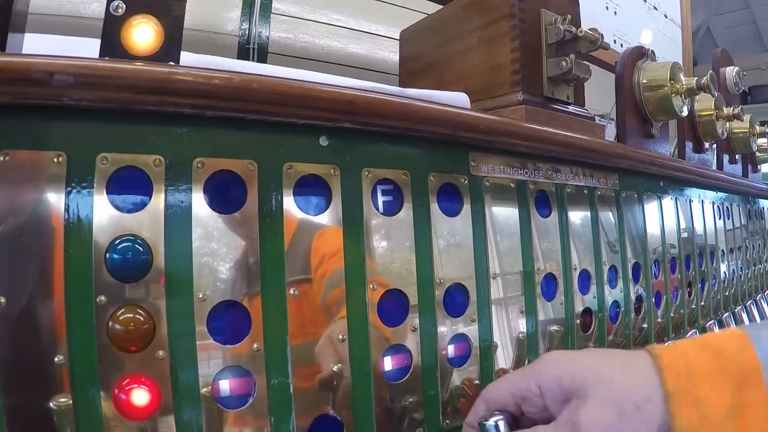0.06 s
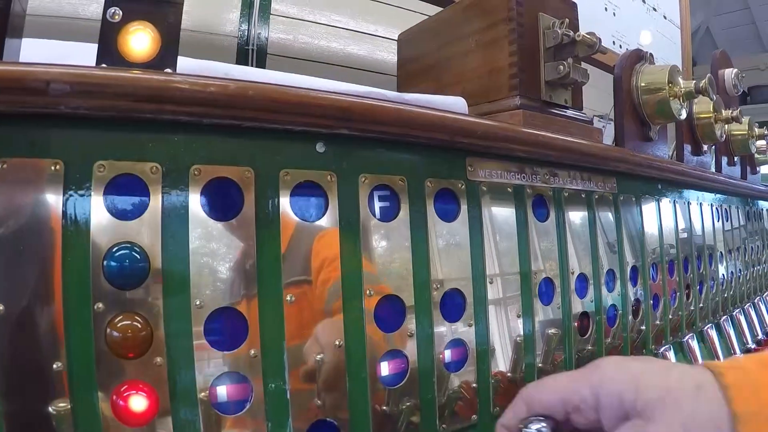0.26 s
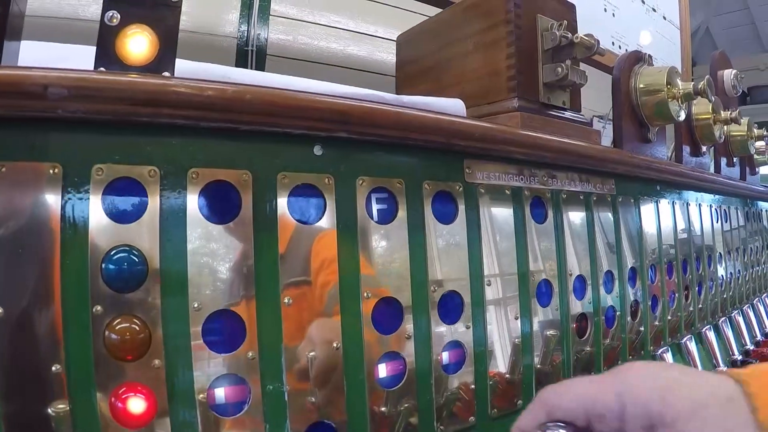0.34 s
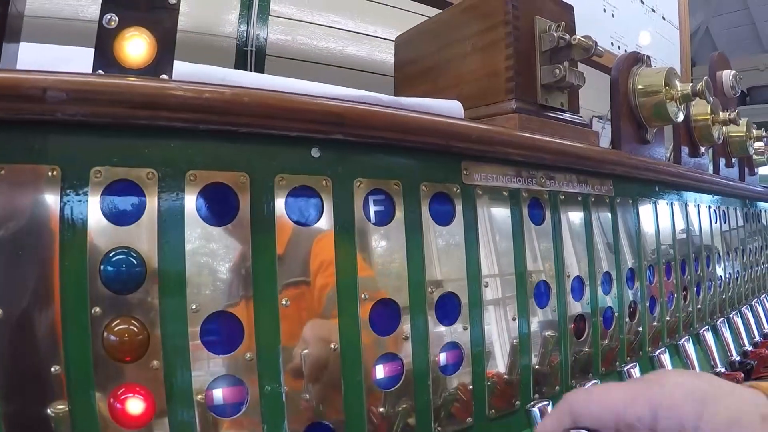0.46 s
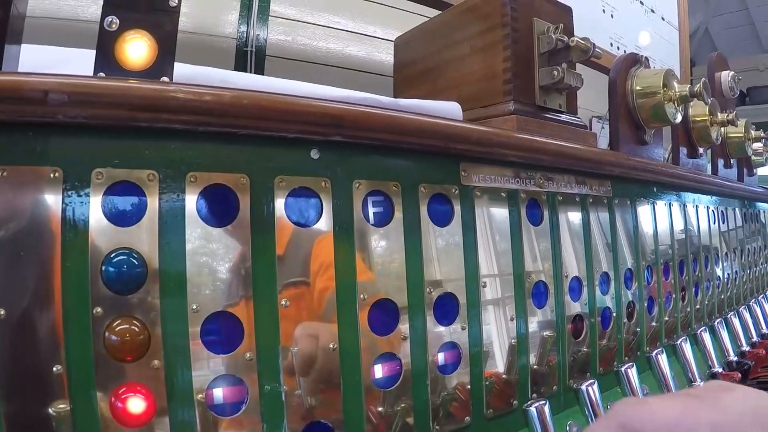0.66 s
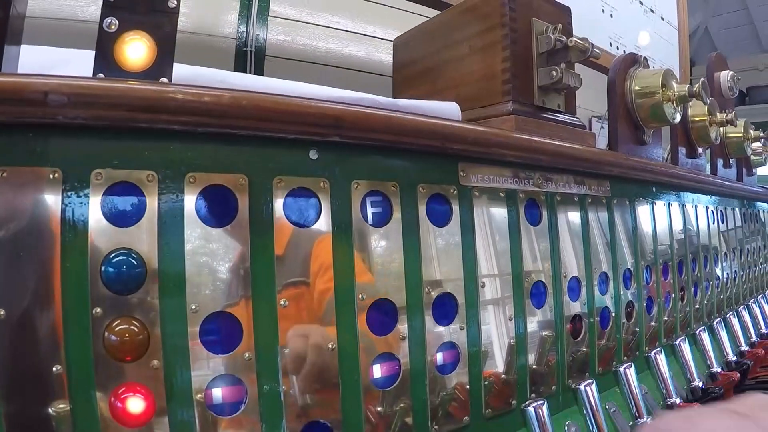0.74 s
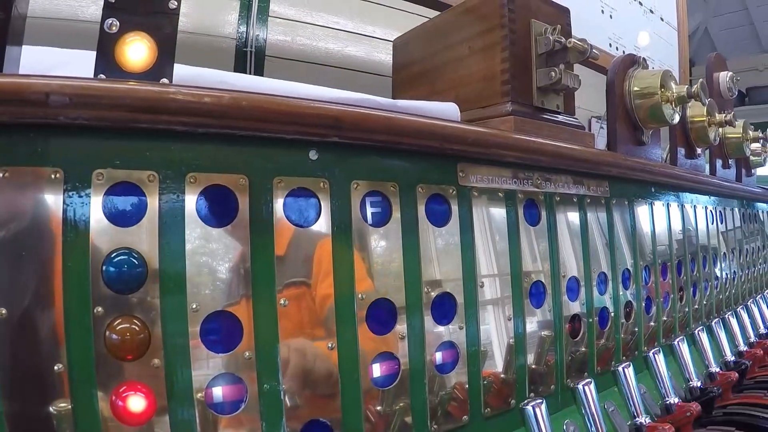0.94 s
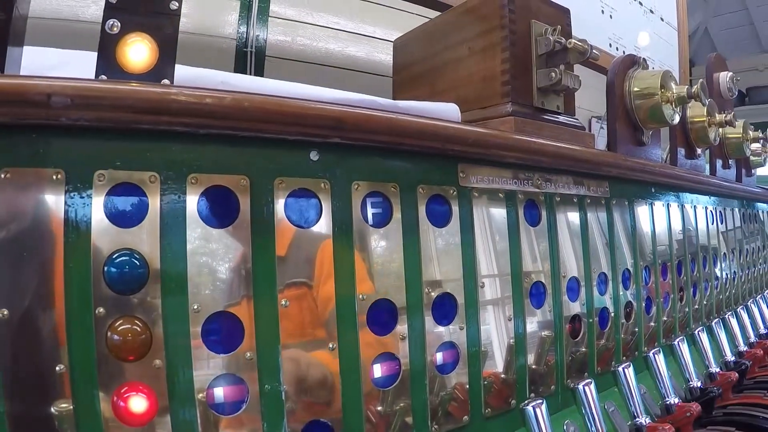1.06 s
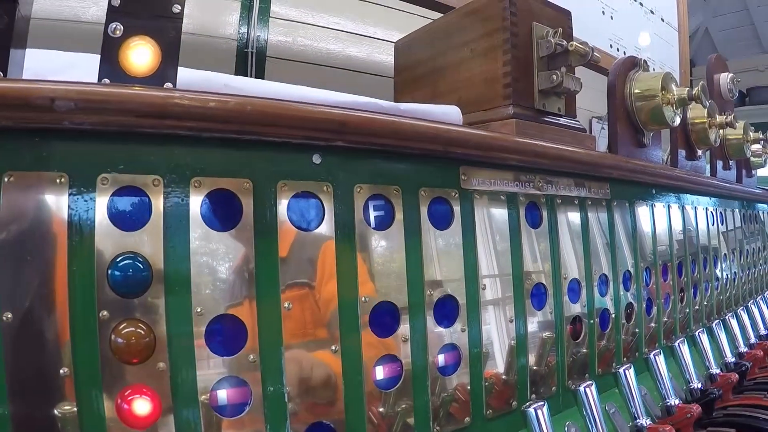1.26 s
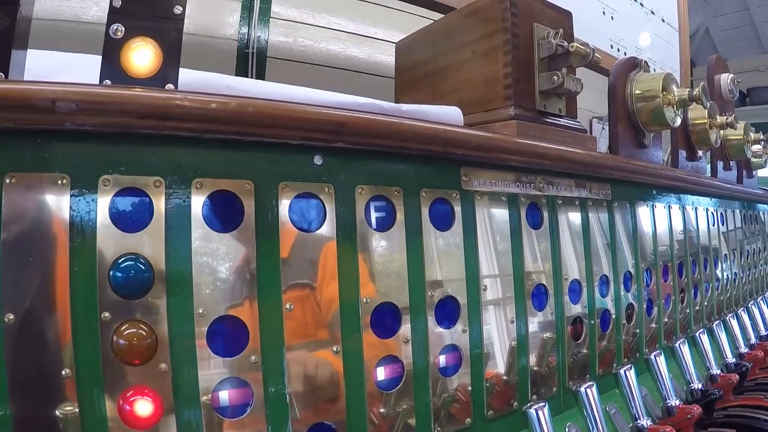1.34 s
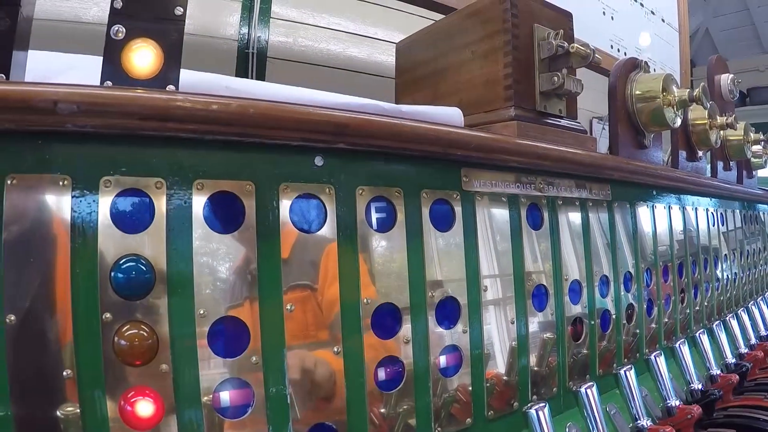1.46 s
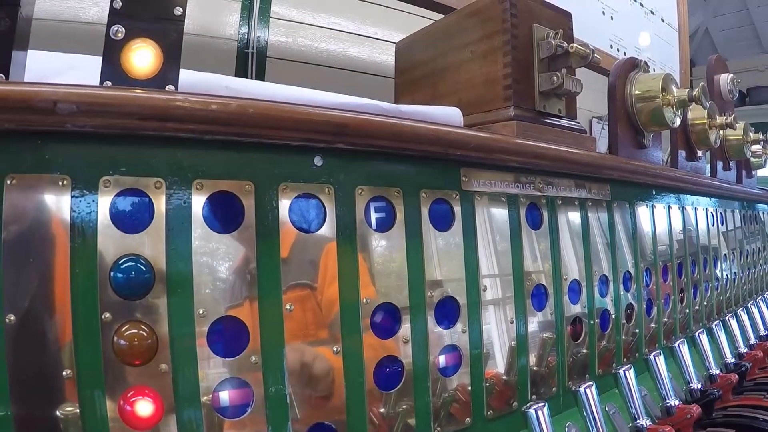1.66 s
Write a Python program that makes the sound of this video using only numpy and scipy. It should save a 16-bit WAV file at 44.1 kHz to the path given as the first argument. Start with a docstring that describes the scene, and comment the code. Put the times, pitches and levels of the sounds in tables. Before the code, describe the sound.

Steel lever gear clanks and rattles close by, followed by a knock and a snap.

```python
"""Inside a railway signal box, the microphone close to a miniature lever. Faint room noise and a low
throb lie underneath, and the ring of an earlier movement dies away. From 0.2 s the steel locking gear
in the cabinet clanks twice, striking a latch and jolting a spring; at 0.7 s a bar slides home with a
rattle. At 1.1 s the lever knocks against its stop and thuds on the panel; at 1.4 s its catch snaps in."""
import sys
import numpy as np
from scipy import signal
from scipy.fft import rfft, irfft
from scipy.io import wavfile

SR = 44100
rng = np.random.default_rng(int(sys.argv[2]) if len(sys.argv) > 2 else 0)


def dump_mix(stems):
    """Bounce the given channels to the path in sys.argv[1] as a 16-bit WAV at rate SR."""
    frames = np.atleast_2d(stems).T  # one column per channel
    limited = np.clip(frames, -1, 1)  # hard clip at full scale
    pcm = np.round(limited * 32767).astype(np.int16)
    wavfile.write(sys.argv[1], SR, pcm)


N = 74970
T = np.arange(N) / SR
HZ = np.fft.rfftfreq(N, 1 / SR)


def amp(db):
    """Decibels to gain."""
    return 10 ** (np.asarray(db) / 20)


def unit_rms(x):
    """Scales to rms 1."""
    return x / np.sqrt(np.mean(x ** 2) + 1e-20)


def curve(points, hz=HZ):
    """Reads a table on a log-frequency axis."""
    f, value = np.transpose(points)
    return np.interp(np.log(hz + 1), np.log(f + 1), value)


def humps(peaks):
    """Resonance peaks in dB over frequency."""
    return sum(db / (1 + (2 * (HZ - hz) / width) ** 2) for hz, width, db in peaks)


def add(mix, s, sound):
    """Mixes a sound in at s seconds."""
    part = mix[max(round(s * SR), 0):]
    part += sound[:len(part)]


def decay(t, t60):
    """Full level until t = 0, then a fall of 60 dB every t60 seconds."""
    return np.exp(-np.log(1000) * np.maximum(t, 0) / t60)


def rise(seconds):
    """Linear attack."""
    return np.minimum(T / max(seconds, 1e-4), 1)


def wander(axis, step, size=2048):
    """A random curve of rms 1 that turns once per step."""
    return unit_rms(np.interp(axis, np.arange(size) * step, rng.standard_normal(size)))


def noise(colour_db):
    """Noise of rms 1 with the given spectrum."""
    return unit_rms(irfft(amp(colour_db) * np.exp(2j * np.pi * rng.random(len(HZ))), N))


# Decay of frame and room. Each row: frequency in Hz, t60 in seconds.
ROOM_DECAY = [(100, 0.73), (400, 0.32), (1200, 0.4), (4000, 0.44), (8000, 0.34), (14000, 0.28)]
def wash(colour_db, hold=0, stretch=1, grain_db=2, grain_hz=30.15):
    """Crowded resonances of frame and room: they hold, then each band dies at its own speed."""
    uneven = noise(colour_db + grain_db * wander(HZ, grain_hz))
    hz, t, bands = signal.stft(uneven, SR, nperseg=512)
    t60 = stretch * curve(ROOM_DECAY, hz)[:, None]
    return signal.istft(bands * decay(t - hold, t60), SR)[1][:N]


# Spectra of the room noise and the dying ring. Each row: frequency in Hz, level in dB.
AIR_COLOUR = [(25, -10), (55, 4.5), (170, -8), (280, -16.5), (600, -22.5), (1100, -18.5), (1900, -26),
              (12500, -44.5), (15000, -54)]
FADING_COLOUR = [(650, 4.5), (2500, -4), (4500, -10), (6800, -11), (9000, -24), (15000, -25)]
# Two low tones that beat. Each row: frequency in Hz, level in dB.
THROB_TONES = [(30.4, -40), (33.7, -39)]
def room_tone(throb_peak_s=0.64):
    """All around the microphone: room noise, a beating throb and the last of an earlier ring."""
    air = amp(-47.5) * noise(curve(AIR_COLOUR))
    throb = sum(amp(db) * np.cos(2 * np.pi * hz * (T - throb_peak_s)) for hz, db in THROB_TONES)
    return air + throb + amp(-49) * wash(curve(FADING_COLOUR), stretch=5.7)


def contact(colour_db, t60):
    """Metal meets metal: a brief crack with a smooth spectrum."""
    shape = rise(0.00021) * decay(T, t60)
    burst = rfft(shape * rng.standard_normal(N))
    coloured = irfft(amp(colour_db) * burst / (abs(burst) + 1e-9), N)
    crack = coloured * rise(0.0002) * decay(T - t60 / 2, t60)
    return unit_rms(crack) * np.sqrt(np.mean(shape ** 2))


# Each row: start in seconds, level in dB, t60 in seconds, centre in Hz, width in octaves.
GEAR_KNOCKS = [(.2165, -35, 0.092, 580, 0.31), (0.2171, -27.5, 0.17, 1285, 0.23),
               (0.2198, -27, 0.047, 3840, 0.64), (0.2247, -12, 0.029, 4580, 0.38),
               (.2575, -23, 0.043, 3760, 0.13), (0.5456, -23.5, 0.021, 4760, 0.39),
               (0.5492, -20.5, 0.042, 4700, 0.49), (0.568, -24, 0.032, 4100, 0.68),
               (0.7096, -35.5, 0.08, 2400, 0.21), (0.7599, -23.5, 0.024, 1240, 0.63)]
def gear_knocks():
    """Sharp contacts in the gear, each cracking in its own band."""
    out = np.zeros(N)
    for s, db, t60, hz, width in GEAR_KNOCKS:
        octaves = np.log2((HZ + 1) / hz)
        band_db = -21 * np.log10(1 + (octaves / width) ** 2)
        add(out, s, amp(db) * contact(band_db, t60))
    return out


def ring(modes, hold=0, waver=0.58, waver_s=0.0246):
    """Partials that hold, then decay; each wavers in level and phase."""
    out = np.zeros(N)
    for hz, db, t60 in modes:
        drift = wander(T, waver_s) + 1j * wander(T, waver_s)
        sway = (1 + waver * drift) / np.sqrt(1 + 2 * waver ** 2)
        tone = np.exp(2j * np.pi * (hz * T + rng.random()))
        out += amp(db) * decay(T - hold, t60) * (sway * tone).real
    return out


def rattle(colour_db, hold, stretch=1, depth_db=0.4, grain_s=0.0062):
    """Loose steel chatters for the hold time and rings out."""
    chatter_db = depth_db * wander(T, grain_s) * decay(T - hold, 0.65)
    return amp(chatter_db) * wash(colour_db, hold, stretch)


# Modes of the bars and the cabinet. Each row: frequency in Hz, level in dB, t60 in seconds.
STEEL_MODES = [(1021, 2, 0.48), (1080, -4, 0.71), (2597, -2.5, 0.71), (3730, -5.5, 0.37), (3920, -2, 0.36),
               (4010, -1, .42), (4150, -5, 0.34), (4352, -1.5, 0.38), (4700, -7, 0.42), (5080, 2, .36),
               (5590, -9.5, 0.55)]
CABINET_MODES = [(87.7, -2.5, 0.48), (105.6, 1, 0.52), (171.7, -1.5, 0.24)]
def steel_and_cabinet(steel_db, boom_db, hold):
    """The steel bars ring and the cabinet booms around them."""
    steel = amp(steel_db) * ring(STEEL_MODES, hold)
    return steel + amp(boom_db) * ring(CABINET_MODES, hold, waver=0.61, waver_s=0.06)


# Each row: start in seconds, rattle level in dB, rise and hold in seconds, tilt in dB per octave,
# steel ring and cabinet boom in dB, factor on the rattle's decay time.
GEAR_CLANKS = [(0.221, -21.5, 0.016, 0.063, -1, -35.5, -27.5, 1.13),
               (0.373, -39, 0.032, 0.067, -5.5, -59, -46, 1.13),
               (0.5452, -25.5, 0.0072, 0.062, -0.8, -38.5, -34.5, 1)]
# Spectrum of the rattle. Each row: frequency in Hz, level in dB.
GEAR_COLOUR = [(120, -18), (200, -6), (309, -14), (540, -11), (1040, -9), (1490, -10.5), (4010, -5),
               (6400, -6), (7020, -12), (9050, -12), (15000, -29)]
def gear_clanks():
    """The locking gear clanks twice in its cabinet, with a faint rattle between."""
    out = np.zeros(N)
    for s, db, rise_s, hold, tilt, steel_db, boom_db, stretch in GEAR_CLANKS:
        colour_db = curve(GEAR_COLOUR) + tilt * np.log2(HZ / 1000 + 1)
        body = amp(db) * rattle(colour_db, hold, stretch)
        add(out, s, rise(rise_s) * (body + steel_and_cabinet(steel_db, boom_db, hold)))
    return out


# Each row: start in seconds, level in dB.
LATCH_HITS = [(.2238, -22.5), (.5492, -25.5)]
# Each row: frequency in Hz, level in dB.
LATCH_MODES = [(545, -5.5), (1250, -6), (1380, -4), (1680, -11.5), (2450, -13), (2820, -10), (3920, -1),
               (4330, -8), (4770, 0), (5080, 0), (5640, -9)]
def latch(t60=0.086):
    """A steel latch is struck at the start of each loud clank."""
    out = np.zeros(N)
    modes = [(hz, db, t60) for hz, db in LATCH_MODES]
    for s, db in LATCH_HITS:
        add(out, s, amp(db) * rise(0.00091) * ring(modes))
    return out


# Each row: start in seconds, level in dB, hold in seconds, pitch factor.
SPRING_JOLTS = [(.257, -32.5, .035, .987), (.566, -29, .045, 1)]
# Each row: frequency in Hz, level in dB, t60 in seconds.
SPRING_MODES = [(6365, -1, .36), (6517, 0, .28)]
def return_spring():
    """A jolted spring rings more purely than the bars."""
    out = np.zeros(N)
    for s, db, hold, pitch in SPRING_JOLTS:
        modes = [(hz * pitch, level, t60) for hz, level, t60 in SPRING_MODES]
        add(out, s, amp(db) * rise(0.001) * ring(modes, hold, waver=0.15))
    return out


# Each row: start in seconds, level in dB, rise and hold in seconds.
BAR_PUSHES = [(0.697, -37, 0.016, 0.042), (0.737, -31.5, 0.019, 0.063)]
# Spectrum of the scrape, then the bar's fine ringing. Each row: frequency in Hz, level in dB.
SCRAPE_COLOUR = [(120, -43), (200, -7), (412, -3), (503, -8.5), (761, -4.5), (1360, -11), (1660, -8.5),
                 (4980, -10.5), (7150, -17.5), (15000, -44)]
BAR_MODES = [(3074, -19), (4860, -17), (6024, -15), (6971, -24.5), (8400, -28), (9179, -20), (10650, -41)]
# Resonances of the bar. Each row: centre and width in Hz, boost in dB.
BAR_PEAKS = [(1087, 70, 7.5), (2430, 85, 6.5), (5900, 100, 1), (7140, 300, 6), (8460, 130, 10),
             (9130, 220, 9), (10400, 400, 3)]
def sliding_bar(t60=0.42):
    """A bar scrapes home in two pushes, ringing itself, the steel and the cabinet."""
    out = np.zeros(N)
    for s, db, rise_s, hold in BAR_PUSHES:
        scrape = rattle(curve(SCRAPE_COLOUR) + humps(BAR_PEAKS), hold)
        bar = ring([(hz, level, t60) for hz, level in BAR_MODES], hold)
        frame = steel_and_cabinet(steel_db=-16, boom_db=-5.5, hold=hold)
        add(out, s, amp(db) * rise(rise_s) * (scrape + bar + frame))
    return out


def clack(hits, colour, modes, tail_colour_db, ring_s, ring_db, tail_db):
    """A blow close to the microphone: contacts, the part's ring, early reflections and the room."""
    out = np.zeros(N)
    for s, db, t60 in hits:
        add(out, s, amp(db) * contact(curve(colour), t60))
    partials = sum(amp(db) * decay(T, t60) * np.cos(2 * np.pi * hz * T) for hz, db, t60 in modes)
    add(out, ring_s, -amp(ring_db) * rise(0.00055) * partials)
    early_lift = 1 + amp(-11.5) * decay(T, 0.18)
    add(out, ring_s, amp(tail_db) * rise(0.0011) * early_lift * wash(tail_colour_db))
    return out


# Each row: start in seconds, level in dB, t60 in seconds.
STOP_CONTACTS = [(1.1134, -27, 0.051), (1.1148, -11.5, 0.023)]
# Spectra of the knock and its tail in the room. Each row: frequency in Hz, level in dB.
STOP_CRACK = [(200, -22), (600, -15), (1300, 3), (1800, -10), (2300, -4.5), (3700, -1.5), (5400, -10),
              (6400, -5), (12500, -5.5), (15000, -15)]
STOP_ROOM = [(60, -11), (100, -2.5), (200, -5.5), (310, -1), (560, -8), (750, -7.5), (3300, -15),
             (10000, -19.5), (15000, -26)]
# Each row: frequency in Hz, level in dB, t60 in seconds.
STOP_RING = [(106.6, -17.5, 0.99), (167, -16.5, 0.45), (204, -3.5, 0.046), (239.7, -17.5, 0.66),
             (520, -6, 0.15), (569, -1, .05), (1137, -2, 0.048), (1355, -1.5, 0.037), (2230, -3, .04),
             (3370, -9, 0.11)]
def lever_stop():
    """The lever knocks against its stop and leaves a low ring."""
    tail = curve(STOP_ROOM)
    return clack(STOP_CONTACTS, STOP_CRACK, STOP_RING, tail, ring_s=1.1165, ring_db=-20, tail_db=-25)


# Each row: centre in seconds, level in dB, half-width in seconds.
PANEL_THUDS = [(1.1167, -12, 0.00042), (1.122, -16, 0.00073)]
def panel_thuds():
    """The lever's weight pushes the panel and bounces once: two short pressure pulses."""
    out = np.zeros(N)
    for s, db, width in PANEL_THUDS:
        x = (T - s) / width
        out -= amp(db) * (1 - x ** 2) * np.exp(-x ** 2 / 2)
    return out


# Each row: start in seconds, level in dB, t60 in seconds.
CATCH_CONTACTS = [(1.3818, -9.5, 0.021), (1.385, -26, 0.036)]
# Spectra of the snap and its tail in the room. Each row: frequency in Hz, level in dB.
CATCH_CRACK = [(200, -29), (850, -22), (1220, -2), (1900, -12), (3400, 1.5), (4800, -10.5), (7400, 1.5),
               (9200, -0.5), (11500, -12), (14800, -7.5)]
CATCH_ROOM = [(100, -7), (175, -9), (390, -4), (760, -16), (1200, -7), (2300, -15), (3500, -7.5),
              (4100, -13.5), (8000, -13), (15000, -19)]
# Each row: frequency in Hz, level in dB, t60 in seconds.
CATCH_RING = [(1215, 0.5, 0.04), (1180, -13.5, 0.2), (1640, -24, 0.32), (2710, -6, 0.02),
              (2880, -6.5, 0.03), (3580, -3.5, 0.072), (3604, -5.5, .035), (3710, -10.5, 0.16),
              (4400, -9.5, .04), (8200, -2, 0.028), (9000, -6.5, 0.034)]
# Resonances in the tail. Each row: centre and width in Hz, boost in dB.
LINGERING_PEAKS = [(1714, 120, 4), (3690, 140, 6), (8150, 190, 9.5), (8900, 210, 10)]
def lever_catch():
    """The catch snaps in, and bright resonances linger."""
    tail = curve(CATCH_ROOM) + humps(LINGERING_PEAKS)
    return clack(CATCH_CONTACTS, CATCH_CRACK, CATCH_RING, tail, ring_s=1.3822, ring_db=-16, tail_db=-26)


def scene():
    """Lever, gear and room at one close microphone."""
    lever = lever_stop() + panel_thuds() + lever_catch()
    gear = latch() + gear_clanks() + gear_knocks() + return_spring() + sliding_bar()
    return (lever + gear + room_tone())[None]


def record(dry, edge_hz=15250):
    """The band limit of the recorder."""
    lowpass = signal.firwin(255, edge_hz, window=("kaiser", 9), fs=SR)
    return signal.oaconvolve(dry, lowpass[None], "same")


dry = scene()
out = record(dry)
dump_mix(out)
```